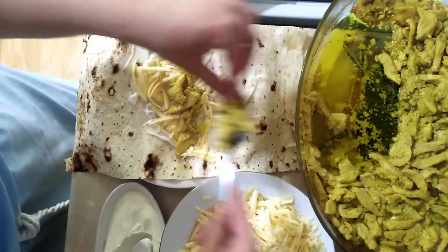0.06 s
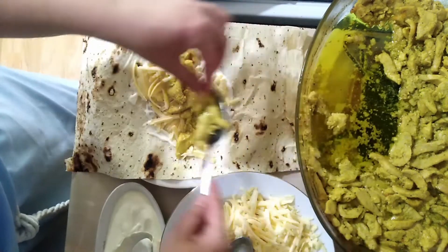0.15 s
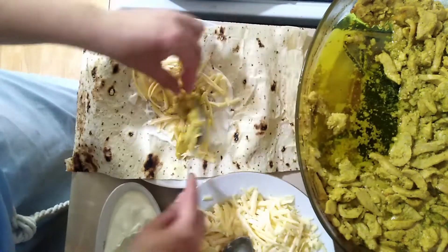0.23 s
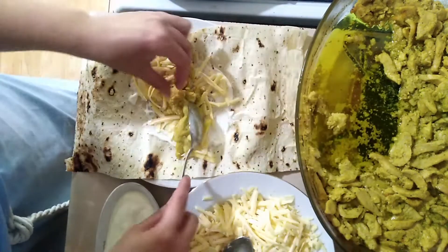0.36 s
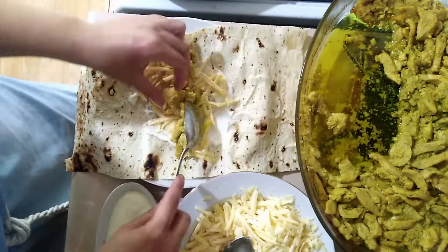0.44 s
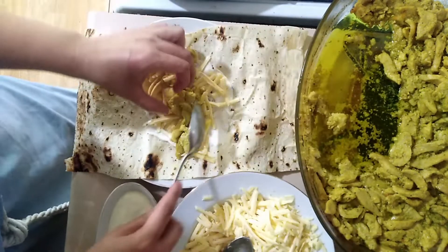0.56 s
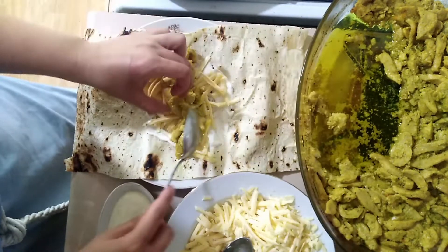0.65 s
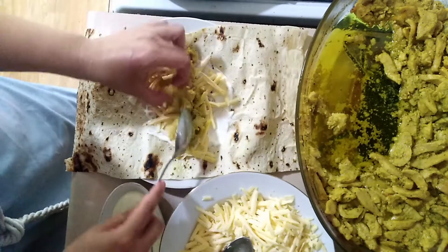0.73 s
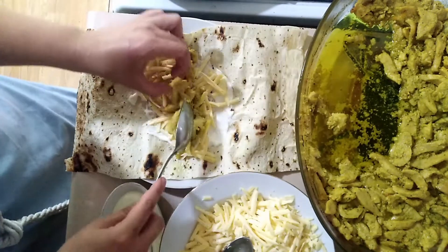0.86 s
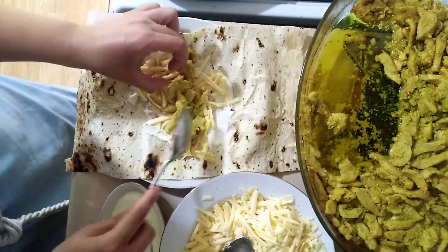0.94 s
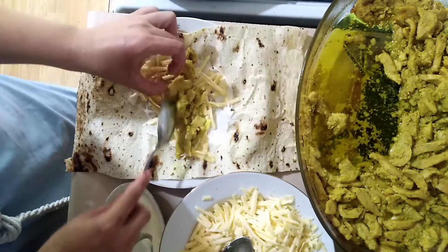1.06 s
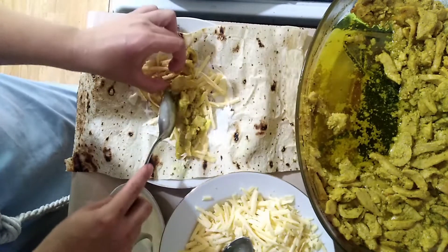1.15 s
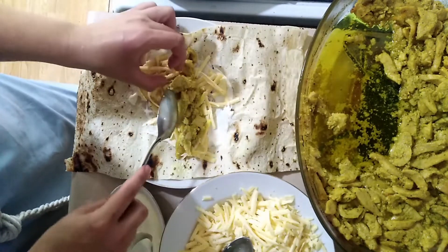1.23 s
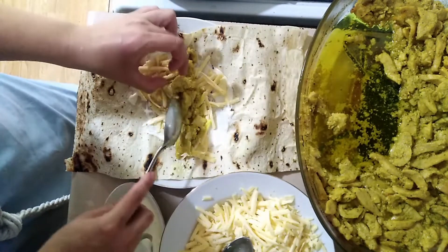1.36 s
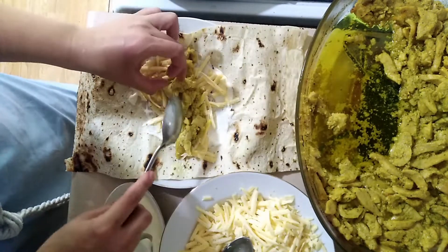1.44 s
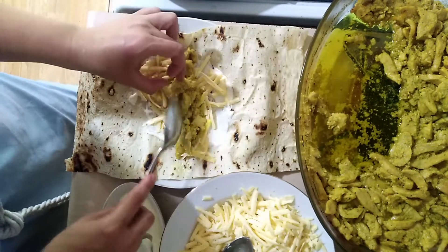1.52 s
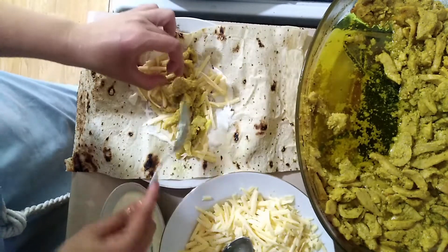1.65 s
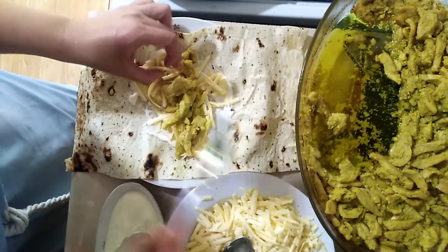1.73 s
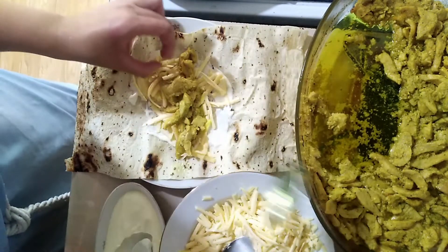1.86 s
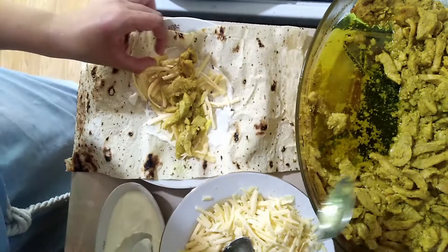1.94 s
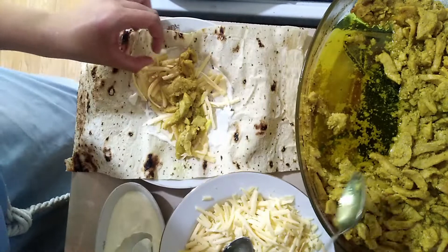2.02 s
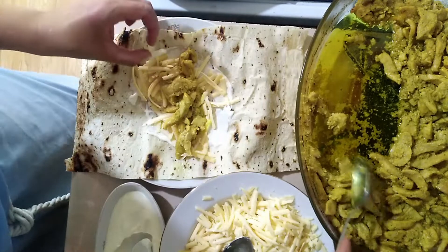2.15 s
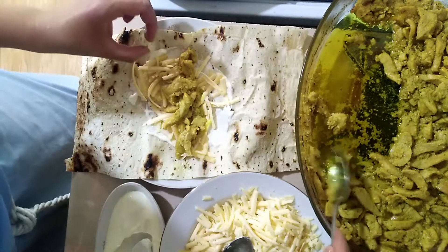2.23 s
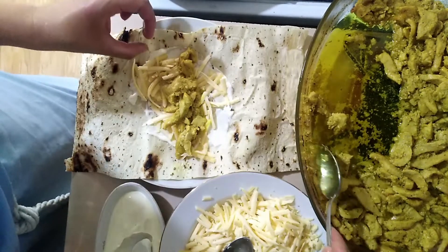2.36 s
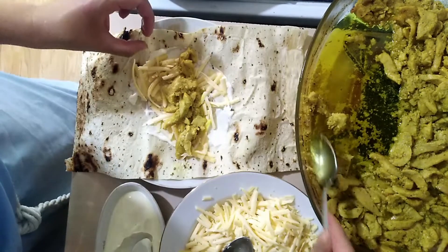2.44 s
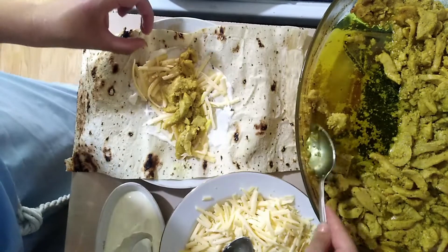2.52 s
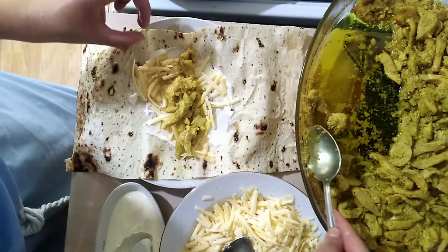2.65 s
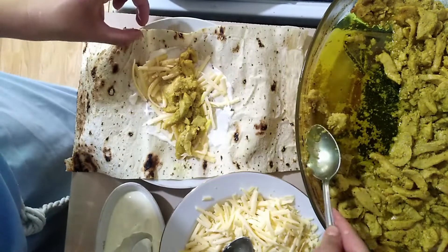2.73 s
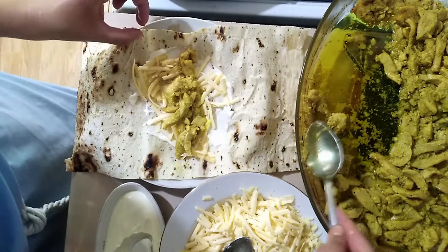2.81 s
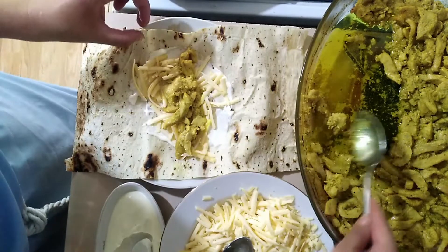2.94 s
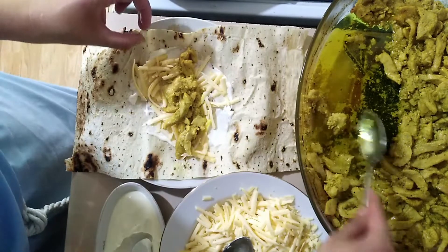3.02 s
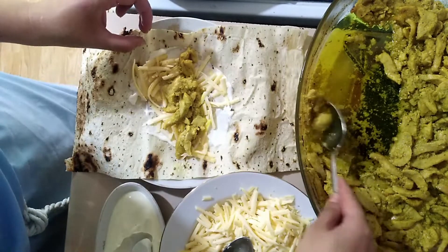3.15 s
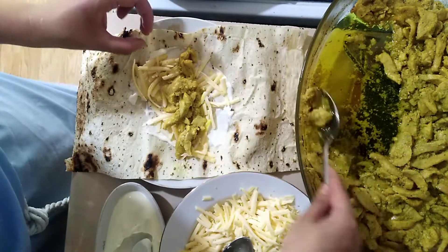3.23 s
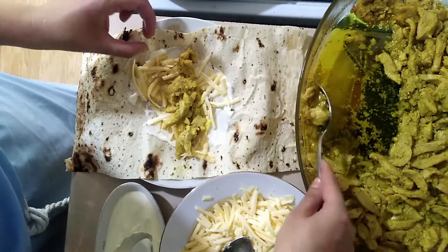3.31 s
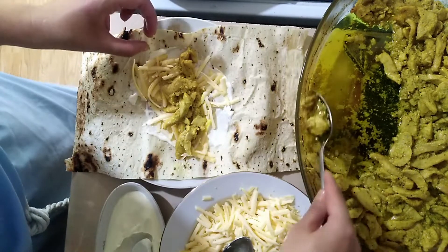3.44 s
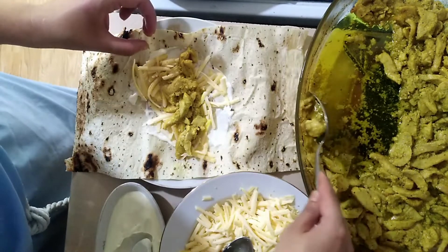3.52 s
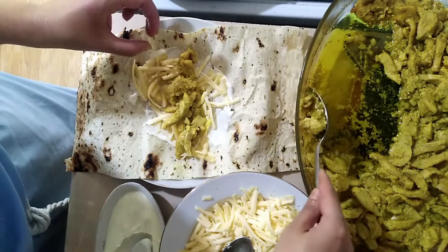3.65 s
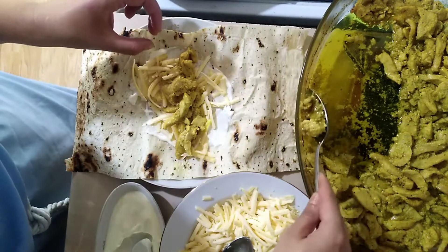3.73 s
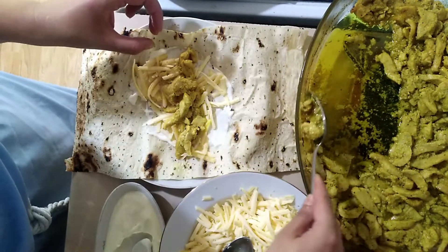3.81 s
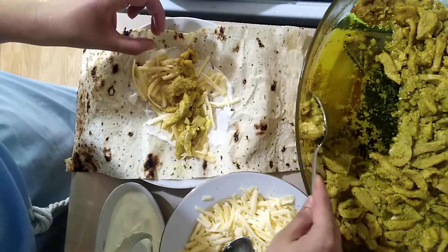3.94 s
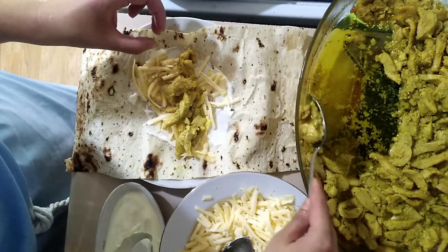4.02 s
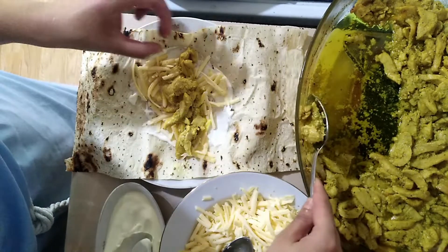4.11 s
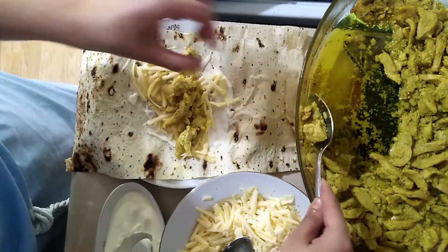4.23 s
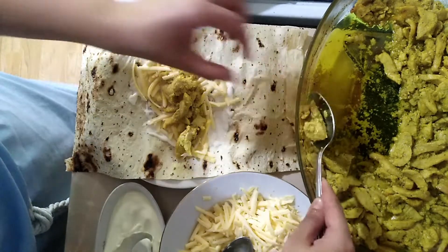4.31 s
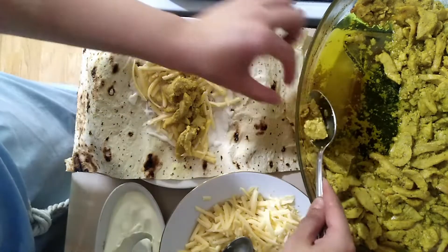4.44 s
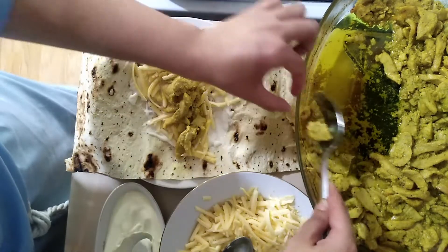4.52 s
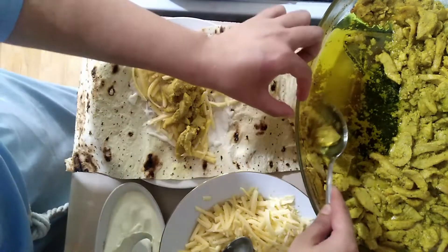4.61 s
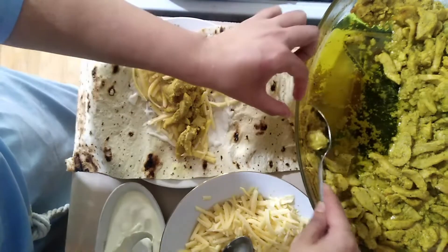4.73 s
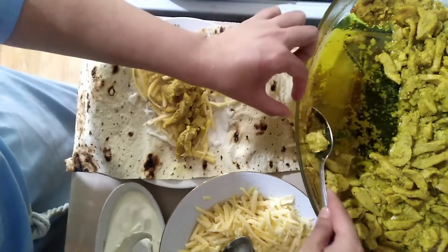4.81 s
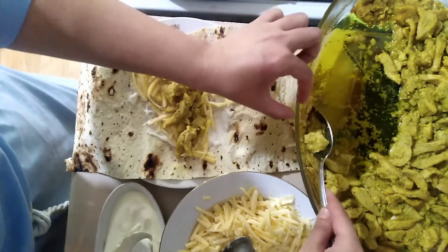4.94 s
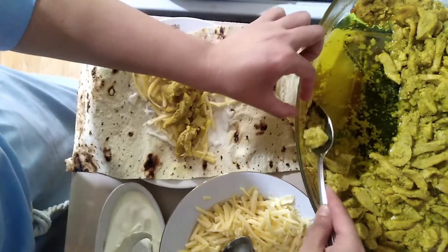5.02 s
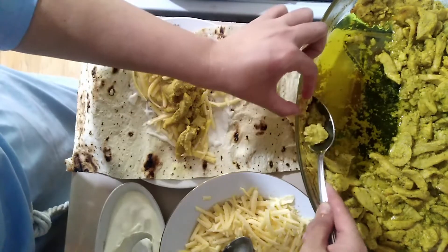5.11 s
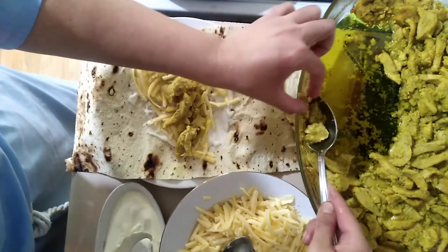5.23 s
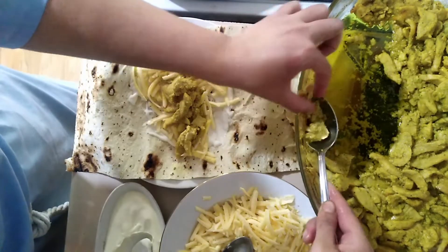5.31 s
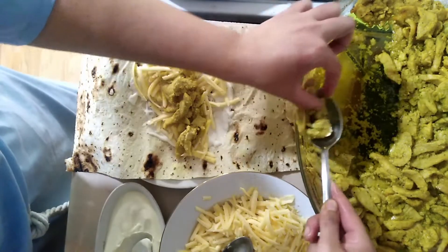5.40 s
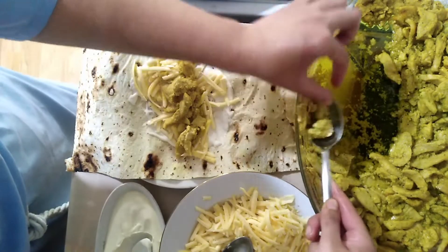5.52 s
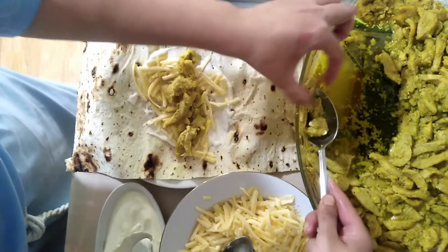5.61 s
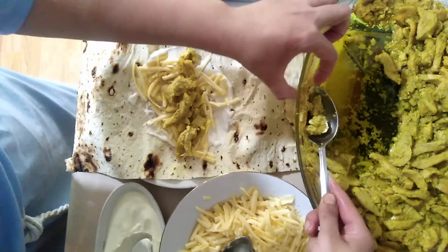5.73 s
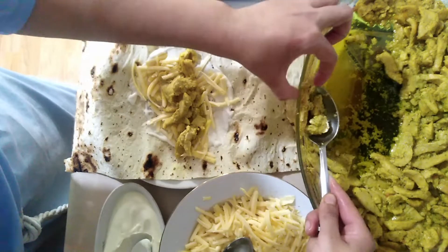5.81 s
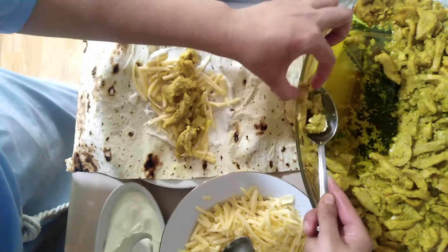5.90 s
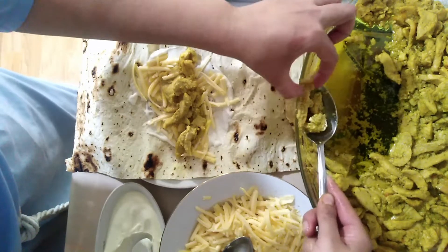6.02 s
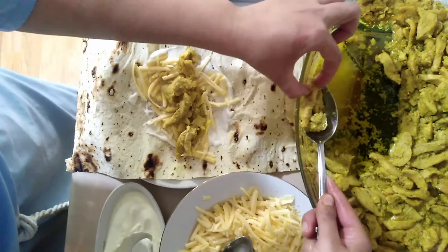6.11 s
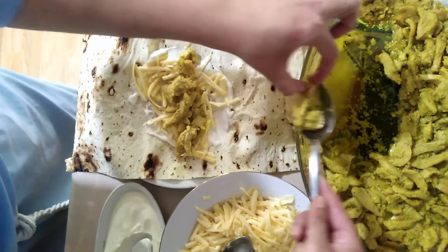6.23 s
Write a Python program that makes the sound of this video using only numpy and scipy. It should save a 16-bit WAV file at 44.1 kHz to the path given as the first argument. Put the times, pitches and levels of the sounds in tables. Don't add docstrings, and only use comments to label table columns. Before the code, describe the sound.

Over faint kitchen hum, a spoon scrapes food onto flatbread, then clanks sharply against a heavy glass bowl, the last knock ringing longest.

```python
import sys
import numpy as np
from scipy import signal
from scipy.fft import rfft, irfft, next_fast_len
from scipy.io import wavfile
from scipy.ndimage import uniform_filter1d, map_coordinates

SR = 44100
rng = np.random.default_rng(int(sys.argv[2]) if len(sys.argv) > 2 else 0)


def dump_mix(stems):
    frames = np.atleast_2d(stems).T
    limited = np.clip(frames, -1, 1)
    pcm = np.round(limited * 32767).astype(np.int16)
    wavfile.write(sys.argv[1], SR, pcm)


def natural_amplitude(level_db):
    exponent = np.asarray(level_db, float) / 20
    return 10 ** exponent


N = 276066
SIZE = next_fast_len(N)
HZ = np.maximum(np.arange(SIZE // 2 + 1) * SR / SIZE, 1)

# freq_hz, density_db_per_hz
HUM_SPECTRUM = [(12, -72), (20, -41.5), (47, -17), (119, 2.5), (166, -5), (201, -8), (271, -18), (300, -13),
                (327, -24.5), (400, -26.5), (520, -55.5), (880, -120)]
# time_s, level_db
RUMBLE_LOAD = [(0, -52.5), (.7, -54.5), (1.5, -58), (2.2, -56.5), (2.8, -56), (3.2, -57), (4.1, -55),
               (4.7, -58), (5.3, -54.5), (5.8, -55), (6.26, -56.5)]
# centre_hz, width_hz, level_db
FAN_BANDS = [(1084.3, 130, -10.5), (1201, 250, -6), (1371, 210, -7), (1518.7, 150, 0.5), (1616, 180, -6)]
# time_s, level_db
FAN_LOAD = [(0.0, -58.5), (0.57, -57), (1.06, -58), (3.03, -58.5), (3.52, -59), (4.13, -56), (4.509, -60),
            (5.54, -61.5), (5.68, -59), (5.84, -57), (6.01, -65), (6.26, -61)]
MAINS_HZ, MAINS_DB = 292.9, -77.5

# freq_hz, likeness_0_to_1
PORT_LIKENESS = [(40, .78), (130, .88), (300, .6), (700, .3), (1400, .6), (3000, .2), (15000, .05)]
# freq_hz, left_minus_right_db
PORT_BALANCE = [(60, 2.5), (110, -3.5), (200, 10.5), (380, -10.5), (700, 13), (1290, -11), (2380, -6),
                (4400, 0.5), (8120, -0.5), (15000, -1)]
HUM_LAG_MS, BOWL_LAG_MS = 0.22 + 0.01, 0.22

# freq_hz, density_db_per_hz
RESIDUE_SPECTRUM = [(1000, -39), (1700, -12), (1990, -27), (4660, -23), (5110, -23), (7470, -31.5),
                    (8500, -33.5), (13100, -36.5), (14100, -37.5), (14350, -90)]
RESIDUE_DB = -81
# centre_hz, width_hz, shut_level_db
LEAK_BANDS = [(450, 290, -86), (640, 94, -84.5), (840, 130, -93), (4690, 130, -87.5)]
# start_s, end_s, band_hz, peak_db
LEAK_SPELLS = [(0.0, 0.387, 640, -67.5), (0.042, 0.174, 4690, -83.5), (0.277, .44, 4690, -76),
               (0.48, 0.526, 4690, -79), (0.084, 0.352, 450, -70.5), (0.523, 0.853, 450, -67),
               (0.53, 0.87, 640, -67.5), (0.894, 1.142, 4690, -82), (0.896, 1.406, 640, -71.5),
               (1.036, 1.35, 450, -77), (1.57, 2.476, 4690, -67), (1.813, 2.046, 640, -73),
               (2.267, 2.966, 640, -70.5), (2.29, 2.756, 450, -70.5), (2.475, 3.32, 4690, -68),
               (3.04, 3.189, 640, -69), (3.063, 3.287, 840, -64), (3.366, 3.57, 640, -79),
               (3.442, 3.716, 450, -76.5), (3.473, 3.57, 4690, -72), (3.62, 4.05, 4690, -69.5),
               (4.08, 4.21, 4690, -74), (3.935, 4.463, 640, -76), (4.194, 4.28, 640, -60),
               (4.642, 4.73, 4690, -81), (4.546, 4.81, 450, -73.5), (4.608, 4.946, 640, -69.5),
               (4.84, 4.94, 4690, -77), (5.058, 5.4, 4690, -73), (5.082, 5.402, 450, -68),
               (5.096, 5.234, 640, -72.5), (5.355, 6.084, 640, -71), (5.444, 6.178, 450, -67),
               (5.505, 5.966, 4690, -72.5), (5.985, 6.152, 4690, -78), (6.198, 6.323, 4690, -68),
               (5.636, 5.79, 840, -71), (4.5, 4.62, 840, -72), (2.78, 2.95, 450, -72),
               (.86, 1.05, 450, -74), (1.55, 1.68, 640, -74), (3.45, 3.6, 840, -78), (4.18, 4.3, 840, -76)]
LEAK_EDGE_SHARE = 0.31
# start_s, end_s, centre_hz, level_db
FLICKERS = [(0.063, 0.186, 5700, -87), (.315, .34, 7140, -84), (.38, 0.524, 5690, -83.5),
            (0.426, 0.469, 3230, -66), (0.82, 0.864, 7420, -78.5), (0.808, 1.495, 7470, -85.5),
            (0.972, 1.128, 5660, -77.5), (1.08, 1.217, 3170, -79), (1.187, 1.493, 3860, -88),
            (1.2, 1.4, 12600, -99), (1.309, 1.47, 5700, -87), (1.584, 1.89, 3250, -86),
            (1.782, 2.356, 5740, -88), (1.977, 2.4, 7430, -88.5), (2.144, 2.25, 5250, -80),
            (2.21, 2.285, 3600, -86), (2.731, 2.82, 7230, -86), (2.857, 2.95, 9000, -92),
            (3.37, 3.443, 7660, -90), (3.395, 3.543, 12840, -99), (3.417, 3.544, 5540, -82.5),
            (4.097, 4.354, 9060, -98), (4.204, 4.313, 5090, -82), (4.349, 4.406, 6940, -82),
            (4.503, 4.741, 12600, -108), (4.543, 4.834, 7670, -93), (4.755, 4.862, 5670, -81),
            (4.87, 4.95, 2880, -80), (4.921, 4.96, 5670, -82.5), (4.995, 5.26, 5750, -77),
            (5.225, 5.258, 7200, -86), (5.299, 5.497, 5760, -87), (2.751, 2.92, 3260, -81),
            (3.323, 3.348, 3300, -77.5), (6.203, 6.258, 3130, -84.5), (6.2, 6.26, 5690, -81),
            (4.95, 5.511, 12600, -99), (4.986, 5.29, 7760, -93), (5.676, 5.993, 5500, -89),
            (.22, .4, 2650, -80), (.62, .8, 4750, -74), (.7, .74, 7000, -82), (3.43, 3.55, 4300, -80),
            (3.27, 3.33, 5200, -82), (4.92, 4.94, 3900, -82), (5.01, 5.05, 3100, -72),
            (5.12, 5.2, 5200, -80), (4.2, 4.32, 2350, -80), (1.95, 2.15, 12800, -98)]

# freq_hz, t60_s
KITCHEN_T60 = [(300, 0.88), (1000, 0.65), (3000, 0.44), (7000, 0.5), (14000, 0.23)]
KITCHEN_DB, TILES_DB_PER_OCTAVE = -11, 2.2
TAIL_SHUTS_S = 0.39
MODES_TO_ROOM_DB, CRACK_TO_ROOM_DB, FOOD_TO_ROOM_DB, TICKS_TO_ROOM_DB = -6, 0, -9, -5.5

# start_s, peak_db_rms, centre_hz, t60_s
CRUMBS = [(0.043, -72, 2400, 0.055), (0.188, -75, 7900, 0.099), (.2, -59.5, 876, 0.14),
          (0.543, -72, 6140, 0.27), (.549, -72, 3720, 0.11), (0.625, -54, 1090, 0.35),
          (0.752, -65, 4210, 0.073), (.872, -74.5, 5500, 0.16), (1.19, -62, 833, .2),
          (1.755, -69.5, 3060, 0.099), (1.83, -62, 810, 0.14), (2.144, -72, 6960, 0.063),
          (2.24, -64.5, 770, 0.16), (2.419, -76.5, 3250, 0.3), (3.479, -69, 4600, 0.17),
          (3.77, -72.5, 2710, 0.1), (4.208, -74.5, 3200, 0.59), (4.515, -71, 7100, 0.17),
          (4.56, -74, 2260, 0.11), (5.185, -70.5, 2640, 0.045), (5.358, -69, 6600, 0.063),
          (5.436, -71.5, 3230, 0.22), (5.832, -48.5, 480, 0.028)]
CRUMB_OCTAVES, CRUMB_RISE_S = 0.24, 0.0054
# start_s, peak_db_rms, centre_hz, t60_s
DRAGS = [(.19, -60.5, 2840, 0.29), (.543, -64, 5340, 0.021), (.547, -63, 810, 0.47), (.56, -64, 3500, 0.52),
         (0.618, -62, 5500, 0.23), (.622, -55, 2500, 0.3), (.63, -55.5, 640, 0.2), (.622, -50, 1000, .22),
         (1.668, -65.5, 3600, 0.092), (3.014, -53, 400, 0.24), (3.02, -57, 620, .2),
         (3.92, -71, 3030, 0.098), (4.17, -77, 2420, 0.29), (4.686, -61.5, 1810, 0.043),
         (4.69, -54.5, 696, 0.12), (4.695, -67, 1660, 0.17), (4.957, -54, 2750, 0.082),
         (4.961, -45, 1410, 0.058), (4.972, -63.5, 2900, 0.22), (5.524, -28.5, 574, 0.069)]
DRAG_OCTAVES, DRAG_RISE_S = 0.59, 0.0015
# start_s, peak_db_rms, centre_hz, t60_s
THUDS = [
    (5.11, -52, 75, .12),
    (5.52, -50, 140, .1),
]
BREAD_PAN_DB, BOWL_PAN_DB, AT_BOWL_FROM_S = 3, -4.5, 1.5

# start_s, level_db, ring_hz, t60_s, left_minus_right_db
TICKS = [(.047, -54.5, 2350, 0.028, -8), (0.192, -55, 2700, 0.054, 7), (0.198, -53, 3270, 0.019, 9),
         (.546, -55, 6460, 0.019, 13), (.548, -57, 3500, .025, 15), (0.556, -52, 4020, .015, 6),
         (.616, -42.5, 5830, .01, 13), (.618, -52, 8200, 0.0091, 9), (.621, -49, 3900, 0.017, 6),
         (.755, -57.5, 3980, 0.036, -6), (.771, -60.5, 4030, 0.028, -3), (1.669, -62, 3230, .015, -10.5),
         (4.689, -49, 1800, 0.019, -10), (4.692, -46, 1130, 0.026, -6), (4.877, -65, 2790, 0.035, -6),
         (4.962, -39, 2590, 0.017, -9), (4.968, -48, 1340, .025, -5), (4.9666, -45, 2480, 0.053, -14),
         (4.969, -51.5, 3600, 0.018, -3), (4.997, -55, 6730, 0.013, -7), (5.187, -58.5, 2750, .02, -3),
         (5.205, -58, 2390, .015, -2.5)]
TICK_SNAP_DB, TICK_RISE_MS = -6, 1

# start_s, level_db, contact_lowpass_hz, ring_t60_share
TAPS = [
    (2.477, -15, 2400, 1),
    (4.686, -23.5, 1150, 1),
    (4.961, -31.5, 2975, 1),
    (5.186, -50, 3000, 1),
    (5.832, -38.5, 6200, 0.94),
]
# freq_hz, held_t60_s, free_level_db, free_t60_s
RIM_MODES = [(443, 0.13, -32, 0.18), (947, 0.234, -5, 0.4), (1150, 0.12, -24.5, 0.16),
             (1330, 0.083, -35, 0.18), (1413, 0.083, -20.5, 0.24), (1810, 0.042, -30, .2),
             (1957, 0.13, -31.5, 0.57), (2525, 0.11, -18.5, 0.14), (2700, 0.058, -20.5, .22),
             (3170, 0.053, -25.5, 0.5), (3130, .07, -22, .2), (3850, 0.082, -33.5, 0.22),
             (4600, 0.044, -27.5, 0.5), (5500, 0.091, -12, 0.17), (6370, 0.096, -16.5, .35),
             (7560, 0.061, -28.5, 0.69), (8400, 0.02, -16, 0.27), (10720, 0.18, -13, .3)]
# first_left_db, first_right_db, last_left_db, last_right_db
RIM_STRENGTHS = [(-40.5, -26, -32.5, -21.5), (-37, -52, -29.5, -25.5), (-27, -31.5, -25.5, -31.5),
                 (-29, -36.5, -48, -14), (-39, -33, -15.5, -10.5), (-30, -28.5, -37, -26),
                 (-24.5, -30, -11.5, -13), (-24.5, -15, -43.5, -22), (-32, -29, -52, -32),
                 (-20.5, -18.5, -21.5, -23), (-30, -30, -30, -31.5), (-24, -14, -24, -16),
                 (-38, -23.5, -21, -19), (-40, -33, -36.5, -36), (-34, -39, -38.5, -29),
                 (-52.5, -71, -25.5, -33), (-49.5, -61, -55.5, -59), (-67.5, -55.5, -42.5, -50)]
# freq_hz, held_t60_s, left_db, right_db, free_level_db, free_t60_s
BOTTOM_MODES = [(946, 0.059, -36, -23, -16, 0.38), (1289, 0.03, -21, -12.5, -49, .2),
                (1421, .05, -20, -15, -25, .25), (1535, .055, -14, -9.5, -25, .28),
                (1940, .07, -31, -28, -22, .3), (2010, 0.098, -38.5, -19, -26.5, 0.17),
                (2755, 0.056, -26, -36, -40.5, 0.15), (3250, 0.055, -35.5, -30.5, -21.5, 0.27),
                (3600, 0.057, -26, -27.5, -34.5, 0.27), (3724, 0.029, -21.5, -27, -30, 0.46),
                (4600, 0.048, -40, -33.5, -25, .2), (6806, 0.06, -49.5, -41.5, -35.5, 0.22),
                (7050, 0.03, -16, -32, -31, 0.11), (9336, 0.018, -56.5, -37, -26.5, .15),
                (10620, 0.071, -53.5, -43, -11.5, .17), (12000, 0.036, -53.5, -48, -22.5, .15),
                (14880, .05, -63.5, -62, -26, .15)]
TWIN_SPLIT_HZ = 14
SHIMMER_HZ = [9260, 9740, 9800, 11350, 12250, 13050, 14150]
SHIMMER_DB, SHIMMER_T60_S, SHIMMER_FREE_DB, SHIMMER_FREE_T60_S = -56, .08, -8, .26
# freq_hz, t60_s, level_db
SPOON_MODES = [(842, 0.13, -17.5), (870, 0.12, -18)]

# start_s, crack_db, crack_t60_s, rise_ms, crack_above_10khz_db
KNOCKS = [
    (2.4591, -22, 0.082, 0.4, -11.5),
    (3.0094, -14, 0.031, 0.43, 0),
    (5.5202, -13, 0.032, 2.3, -4),
]
# freq_hz, density_db_per_hz
CRACK_SPECTRUM = [(250, -38), (650, -18.5), (1440, -3), (2930, -17), (3810, -5), (5130, -17.5), (7250, -20),
                  (8280, -30.5), (14500, -39), (15500, -62.5)]
# wash_db, wash_t60_s,
# lead_in_db, lead_in_ms_per_10db
WASHES = [
    (-42, 0.33, -37, 2.5),
    (-38.5, .3, -30.5, 0.5),
    (-43.5, 0.52, -38.5, 3),
]
BOWL_LOW_CUT_HZ, BOWL_TOP_CUT_HZ = (390, 720, 370), (12800, 15300, 15000)


def at_hz(points, hz):
    table_hz, values = np.array(points).T
    return np.interp(np.log(hz), np.log(table_hz), values)


def rms_one(x):
    return x / np.sqrt(np.mean(x ** 2) + 1e-20)


def add(out, start_s, sound):
    at = round(start_s * SR)
    out[:, at:at + sound.shape[1]] += sound[:, :N - at]


def drift(rate_hz, count=N):
    knots = rng.standard_normal(800)
    return map_coordinates(knots, [np.arange(count) * rate_hz / SR + 2], order=2) * 1.15


def bell(hz, width_hz):
    return 1 / (1 + (2 * (HZ - hz) / width_hz) ** 2) ** 1.31


def band(x, hz, octaves):
    edges_hz = np.clip(hz * 2 ** (np.array([-.5, .5]) * octaves), 50, .45 * SR)
    return rms_one(signal.sosfilt(signal.butter(3, edges_hz, "band", fs=SR, output="sos"), x))


def hiss(shape):
    near, other = rfft(rng.standard_normal((2, SIZE))) * shape
    alike = np.clip(at_hz(PORT_LIKENESS, HZ), 0, 1)
    delay = np.exp(-2j * np.pi * HZ * HUM_LAG_MS / 1000)
    left = alike * near * delay + np.sqrt(1 - alike ** 2) * other
    lean = natural_amplitude(at_hz(PORT_BALANCE, HZ) / 2)
    return rms_one(irfft([left * lean, near / lean], SIZE)[:, :N])


def mottled(x, depth_db, high, long):
    cells = signal.stft(x, nperseg=1024)[2]
    field = rng.standard_normal(cells.shape[1:])
    field = uniform_filter1d(field, size=high, axis=0)
    field = rms_one(uniform_filter1d(field, size=long, axis=1))
    gain = natural_amplitude(depth_db * np.minimum(field, 2))
    return signal.istft(cells * gain, nperseg=1024)[1][:, :N]


def appliance():
    t = np.arange(N) / SR
    rumble_db = np.interp(t, *np.transpose(RUMBLE_LOAD)) + 1.7 * drift(12.0)
    out = natural_amplitude(rumble_db) * hiss(natural_amplitude(at_hz(HUM_SPECTRUM, HZ)))
    out += natural_amplitude(MAINS_DB) * hiss(bell(MAINS_HZ, 20))
    fan = np.zeros((2, N))
    for hz, width_hz, db in FAN_BANDS:
        fan += natural_amplitude(db + 1.1 * drift(23)) * hiss(bell(hz, width_hz) ** 1.66)
    fan_db = np.interp(t, *np.transpose(FAN_LOAD)) + 2.4 * drift(50)
    return out + natural_amplitude(fan_db) * rms_one(fan)


def gated_bands():
    out = np.zeros((2, N))
    centres_hz = np.array(LEAK_BANDS)[:, 0]
    gates = natural_amplitude(np.array(LEAK_BANDS)[:, 2:]) * np.ones(N)
    for start_s, end_s, hz, db in LEAK_SPELLS:
        k = np.argmin(abs(centres_hz - hz))
        swell = signal.windows.tukey(round((end_s - start_s) * SR), LEAK_EDGE_SHARE)
        add(gates[k:k + 1], start_s, natural_amplitude(db) * swell[None])
    for (hz, width_hz, _), gate in zip(LEAK_BANDS, gates):
        flutter_db = 4.5 * np.minimum(drift(18), 1.2)
        out += gate * natural_amplitude(flutter_db) * hiss(bell(hz, width_hz))
    return out


def flickers():
    out = np.zeros((2, N))
    for start_s, end_s, hz, db in FLICKERS:
        count = round((end_s - start_s) * SR)
        flutter_db = 8.8 * np.minimum(drift(26.4, count=count), 1)
        envelope = natural_amplitude(db + flutter_db) * signal.windows.tukey(count, .3)
        noise = band(rng.standard_normal((2, SR)), hz, 170 / hz * np.sqrt(2))
        add(out, start_s, noise[:, :count] * envelope)
    return out


def leaks():
    residue = hiss(natural_amplitude(at_hz(RESIDUE_SPECTRUM, HZ)) * (HZ > 1600))
    return natural_amplitude(RESIDUE_DB) * mottled(residue, 5.0, high=5, long=7) + gated_bands() + flickers()


def kitchen(x):
    t = np.arange(SR // 2) / SR
    tail = np.zeros((2, len(t)))
    for hz in 250 * 2. ** np.arange(7):
        edges_hz = [hz / np.sqrt(2), min(hz * np.sqrt(2), .45 * SR)]
        sos = signal.butter(2, edges_hz, "band", fs=SR, output="sos")
        level_db = TILES_DB_PER_OCTAVE * np.log2(hz / 4000) - 60 * t / at_hz(KITCHEN_T60, hz)
        tail += signal.sosfilt(sos, rng.standard_normal((2, len(t)))) * natural_amplitude(level_db)
    tail *= np.clip((t - .004) / 0.0018, 0, 1)
    tail *= natural_amplitude(-20 * (t / TAIL_SHUTS_S) ** 4)
    tail /= np.sqrt(np.sum(tail ** 2) / 2)
    return natural_amplitude(KITCHEN_DB) * signal.fftconvolve(x[1:], tail, axes=1)[:, :N]


def rustles(events, octaves, rise_s):
    out, t = np.zeros((2, N)), np.arange(SR // 2) / SR
    for start_s, db, hz, t60_s in events:
        grain_db = 3.0 * np.minimum(rng.exponential(1, len(t)), 4)
        grains = band(rng.standard_normal((2, len(t))) * natural_amplitude(grain_db), hz, octaves)
        fade_db = -60 * (np.maximum(t - rise_s, 0) / t60_s) ** 1.6
        pan_db = BREAD_PAN_DB if start_s < AT_BOWL_FROM_S else BOWL_PAN_DB
        pan = natural_amplitude(pan_db * np.array([[.5], [-.5]]))
        add(out, start_s, grains * np.minimum(t / rise_s, 1) * natural_amplitude(db + fade_db) * pan)
    return out


def ticks():
    out, t = np.zeros((2, N)), np.arange(SR // 10) / SR
    rise = (1 - np.exp(-t * 1000 / TICK_RISE_MS)) ** 2
    for start_s, db, hz, t60_s, pan_db in TICKS:
        snap = natural_amplitude(TICK_SNAP_DB - 60 * t / .006) * band(rng.standard_normal(len(t)), hz, 1.14)
        ring = natural_amplitude(-60 * t / t60_s) * np.sin(2 * np.pi * hz * t)
        tick = (ring + snap) * rise
        for side, late_s in enumerate((BOWL_LAG_MS / 1000, 0)):
            side_db = db + 5.5 + pan_db * (.5 - side)
            add(out[side:side + 1], start_s + late_s, natural_amplitude(side_db) * tick[None])
    return out


def struck(modes, sides_db, rise_ms):
    hz, t60_s, free_db, free_t60_s = np.array(modes).T[:, :, None]
    split_hz = TWIN_SPLIT_HZ * rng.uniform(.5, 1.5, hz.shape)
    clock_s = np.arange(SR * 7 // 10) / SR
    jolts = rng.standard_normal((len(modes), 100))
    rattle = np.array([np.interp(clock_s * 120, np.arange(100), row) for row in jolts])
    chatter = natural_amplitude(3.5 * rattle - 1)
    out = []
    for db, late_s in zip(np.transpose(sides_db), (BOWL_LAG_MS / 1000, 0)):
        t = np.maximum(clock_s - late_s, 0)
        held = natural_amplitude(-60 * (t / t60_s) ** 1.16) * np.sin(2 * np.pi * hz * t)
        free = natural_amplitude(free_db - 60 * t / free_t60_s) * np.sin(2 * np.pi * (hz + split_hz) * t)
        rise = 1 - np.exp(-t * 1000 / rise_ms)
        out.append(rise * np.sum(natural_amplitude(db)[:, None] * chatter * (held + chatter * free), axis=0))
    return np.array(out)


def taps():
    out = np.zeros((2, N))
    for start_s, db, cut_hz, share in TAPS:
        modes = np.array(RIM_MODES) * [1, share, 1, 1]
        dull_db = -20 * np.log10(1 + (modes[:, :1] / cut_hz) ** 4)
        dull_db = dull_db + rng.normal(0, 3.1, (len(modes), 2))
        add(out, start_s, struck(modes, np.array(RIM_STRENGTHS)[:, 2:] + db + dull_db, rise_ms=1.1))
    return out


def spoon_ring():
    t = np.arange(SR // 2) / SR
    late = t - [[BOWL_LAG_MS / 1000], [0]]
    out = np.zeros((2, len(t)))
    for sense, (hz, t60_s, db) in zip((1, -1), SPOON_MODES):
        out += sense * natural_amplitude(db - 60 * t / t60_s) * np.sin(2 * np.pi * hz * late)
    return out * (1 - np.exp(-t / .011))


def shimmer(top_db, rise_ms):
    modes = [(hz, SHIMMER_T60_S, SHIMMER_FREE_DB, SHIMMER_FREE_T60_S) for hz in SHIMMER_HZ]
    return struck(modes, SHIMMER_DB + top_db + rng.normal(0, 1.6, (len(modes), 2)), rise_ms)


def knocks():
    rings, cracks = np.zeros((2, 2, N))
    t = np.arange(SR // 2) / SR
    ahead_s = t[:SR // 40][::-1]
    bottom, rim_db = np.array(BOTTOM_MODES), np.array(RIM_STRENGTHS)
    damped = (np.array(RIM_MODES) + [0, 0, -6, 0]) * [1, 1, 1, .7]
    bodies = [(damped, rim_db[:, :2]), (bottom[:, [0, 1, 4, 5]], bottom[:, 2:4]), (RIM_MODES, rim_db[:, 2:])]
    spans_hz = zip(BOWL_LOW_CUT_HZ, BOWL_TOP_CUT_HZ)
    for knock, body, wash, span_hz in zip(KNOCKS, bodies, WASHES, spans_hz):
        start_s, crack_db, crack_t60_s, rise_ms, top_db = knock
        wash_db, wash_t60_s, lead_in_db, lead_in_ms = wash
        span = signal.butter(4, span_hz, "band", fs=SR, output="sos")
        ring = struck(*body, rise_ms) + shimmer(top_db, rise_ms)
        add(rings, start_s, signal.sosfilt(span, ring))

        noise = hiss(natural_amplitude(at_hz(CRACK_SPECTRUM, HZ) + top_db / (1 + (10000 / HZ) ** 6)))
        patchy = rms_one(mottled(noise[:, SR:2 * SR], 5.0, high=7, long=5)[:, :len(t)])
        burst = noise[:, :len(t)] * natural_amplitude(crack_db - 60 * t / crack_t60_s)
        burst += patchy * natural_amplitude(wash_db - 60 * t / wash_t60_s)
        add(cracks, start_s, signal.sosfilt(span, burst * (1 - np.exp(-t * 1000 / rise_ms))))

        lead_in = signal.sosfilt(span, noise[:, -len(ahead_s):])
        add(cracks, start_s - ahead_s[0], lead_in * natural_amplitude(lead_in_db - 10 * ahead_s * 1000 / lead_in_ms))
    add(rings, KNOCKS[1][0], spoon_ring())
    return rings, cracks


def scene():
    rings, cracks = knocks()
    rings = rings + taps()
    ticked = ticks()
    food = rustles(CRUMBS, CRUMB_OCTAVES, CRUMB_RISE_S) + rustles(DRAGS + THUDS, DRAG_OCTAVES, DRAG_RISE_S)
    food = mottled(food, 5.0, high=2, long=19)
    sent = natural_amplitude(MODES_TO_ROOM_DB) * rings + natural_amplitude(CRACK_TO_ROOM_DB) * cracks
    sent += natural_amplitude(FOOD_TO_ROOM_DB) * food + natural_amplitude(TICKS_TO_ROOM_DB) * ticked
    echoes = mottled(kitchen(sent), 3.0, high=4, long=15)
    return rings + ticked + cracks + food + echoes + appliance() + leaks()


def low_pass(x):
    return signal.sosfilt(signal.butter(12, 15820, fs=SR, output="sos"), x)


def record(dry):
    return low_pass(dry)


dry = scene()
out = record(dry)
dump_mix(out)
```